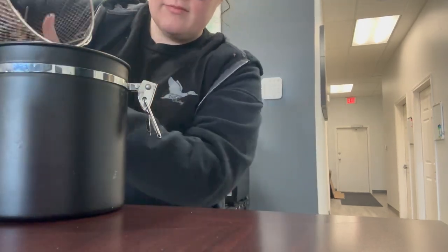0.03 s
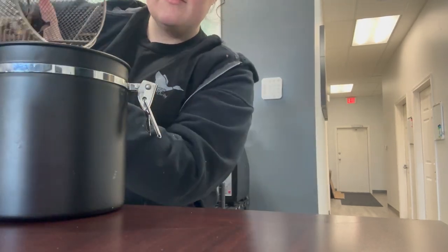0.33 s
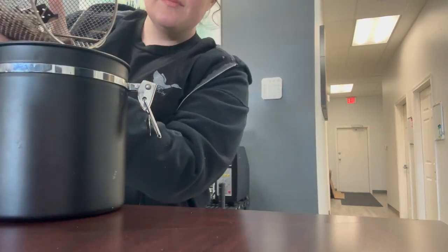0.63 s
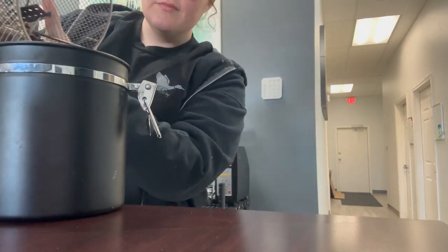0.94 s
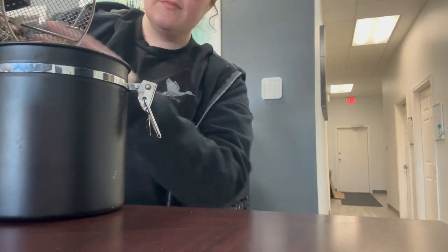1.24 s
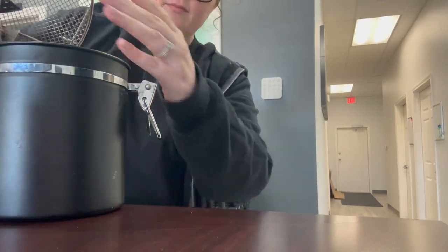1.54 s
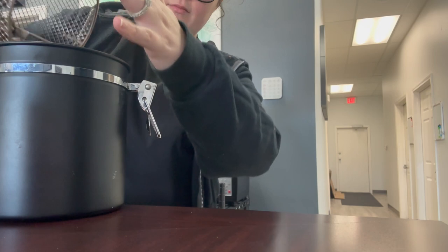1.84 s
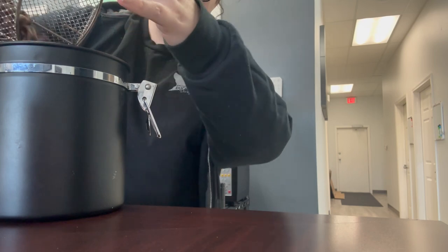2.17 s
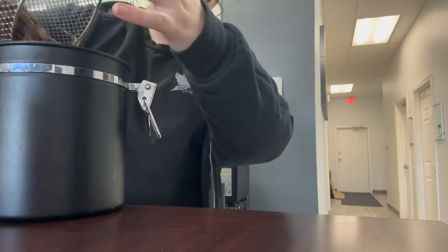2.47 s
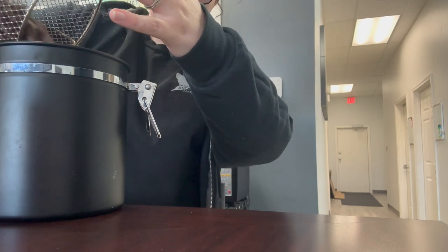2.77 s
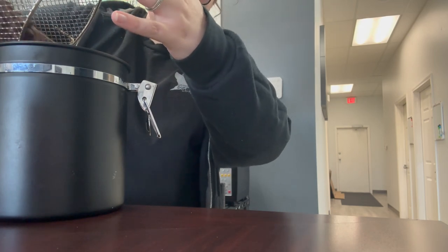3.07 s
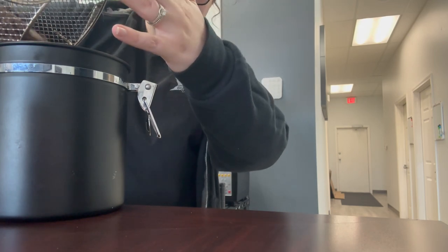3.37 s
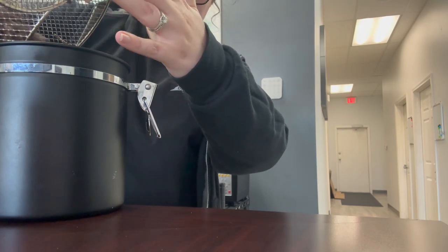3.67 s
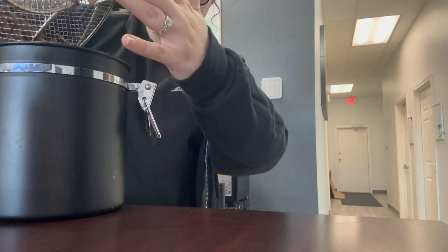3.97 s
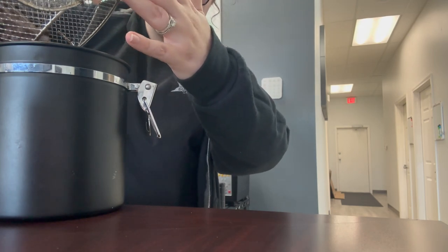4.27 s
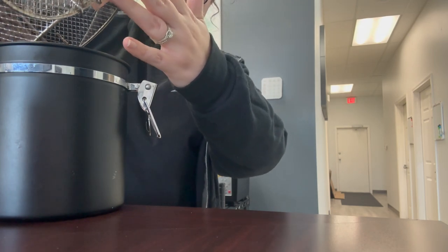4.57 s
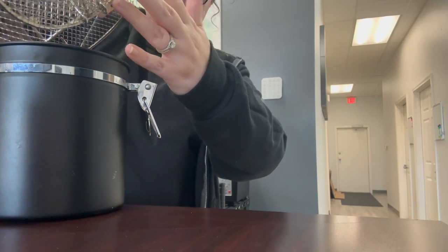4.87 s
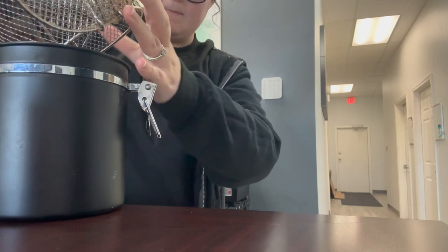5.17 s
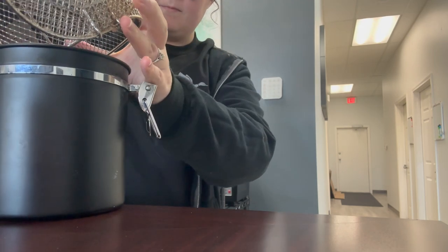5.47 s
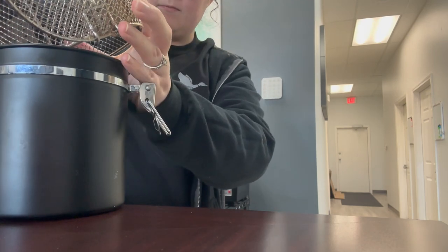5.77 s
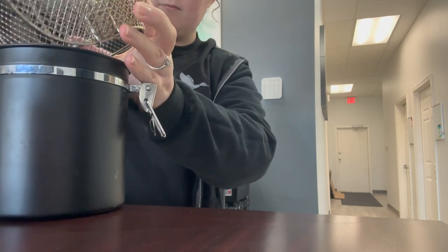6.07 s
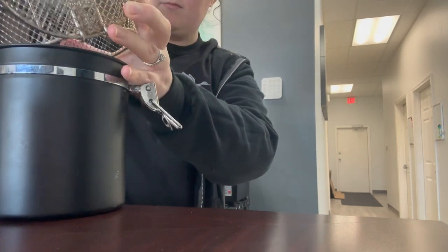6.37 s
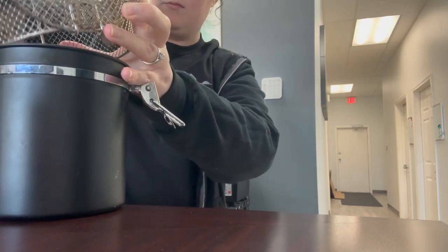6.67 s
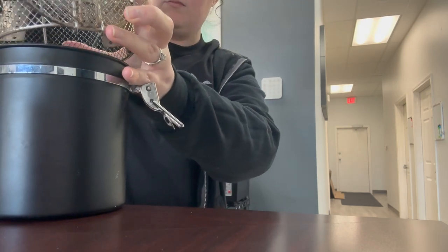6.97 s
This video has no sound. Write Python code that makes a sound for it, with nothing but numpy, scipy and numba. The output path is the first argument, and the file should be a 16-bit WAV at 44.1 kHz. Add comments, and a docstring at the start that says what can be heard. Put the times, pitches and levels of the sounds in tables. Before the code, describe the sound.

Small hard beans pour from a wire sieve into a large metal canister, rattling loudly, thinning to ticks, then the sieve scrapes the rim.

```python
"""Coffee beans hiss over a tilted wire sieve while a sleeve rubs and ventilation hums behind.
Tipped into a large metal canister on a table, a few snap on the bare bottom; then the stream drums
on it and rings its modes. The growing heap muffles the metal: beans patter on beans, the air above
them resonates, and the stream thins to single ticks. Last, the sieve wire squeaks thinly and the
sieve scrapes and knocks on the rim."""
import sys
import numpy as np
from scipy import signal
from scipy.fft import rfft, irfft, next_fast_len
from scipy.io import wavfile
from numba import njit

SR = 44100
rng = np.random.default_rng(int(sys.argv[2]) if len(sys.argv) > 2 else 0)


def digitize_waveform(pressure):
    """Quantize a signal to 16-bit integers and store it at the path in sys.argv[1].

    Rows of a 2-D input are taken as channels; values are limited to [-1, 1].
    """
    field = np.atleast_2d(pressure).T
    bounded = np.clip(field, -1, 1)
    quanta = np.round(bounded * 32767).astype(np.int16)
    wavfile.write(sys.argv[1], SR, quanta)


N = 309141
TIME = np.arange(N) / SR

# sieve envelopes: t/s, level/dB
MESH_SLIDE = [(0, -40), (0.08, -48), (0.27, -39.5), (0.4, -42), (0.55, -44.5), (0.7, -44), (0.85, -50),
              (1.0, -43), (1.12, -69)]  # beans shifting on the mesh
MESH_DRAG = [(5.44, -65), (5.53, -37), (5.72, -39), (5.81, -45), (5.87, -39), (6.02, -46.5), (6.16, -52)]  # mesh drawn over the rim
WIRE_SCRAPE = [(5.2, -47), (5.776, -49), (5.926, -38.5), (6.196, -44), (6.368, -42), (6.47, -49),
               (6.622, -46.5), (6.8, -42.5), (7.0, -50)]  # wire along the rim
# wire rasps on the rim: start/s, end/s, f/Hz, width/Hz, level/dB
WIRE_RASPS = [(5.353, 5.513, 660, 200, -45.5), (5.535, 5.756, 786, 89, -49), (5.823, 5.91, 803, 80, -45),
              (6.26, 6.42, 2820, 900, -48.5), (6.53, 6.586, 1130, 600, -43), (6.691, 6.72, 3200, 1000, -42),
              (6.88, 6.955, 1060, 269, -36)]
# two low hums and a thin squeak of the sieve wire: start/s, end/s, f/Hz, level/dB
FAINT_TONES = [(3.08, 4.22, 89.4, -51), (4.4, 5.4, 123.6, -57.5), (4.85, 5.566, 1180, -60.5)]
# weight shifting on the table, sleeve strokes: start/s, end/s, level/dB
TABLE_RUMBLES = [(.05, 2, -50), (4.9, 7.8, -56), (6.18, 6.36, -45.5), (6.519, 8.1, -50)]
SLEEVE_RUBS = [(0.268, 0.886, -35.5), (6.0, 6.945, -50)]
# first beans on bare metal: t/s, level/dB, ring re snap/dB
FIRST_DROPS = [(0.865, -2, 6.5), (0.879, -25, 26.5), (0.9669, -3.5, -2), (0.9696, -11.5, 2),
               (1.018, -12, 0), (1.0592, -6.5, -20), (1.0905, -11.5, 2), (1.097, -11, -3)]
# tips of the sieve: start/s, end/s, level/dB, sag/(dB/s), run-out t60/s
SIEVE_POURS = [(1.12, 1.633, -39.5, 4.5, 7.3), (1.786, 1.946, -38.5, -3, 1.1),
               (1.973, 2.605, -25.5, 2, 3.53), (3.255, 3.404, -39, 9, 0.32), (3.51, 5.097, -40.5, 0.96, 3),
               (5.132, 5.502, -39.5, 11, 3.1)]
# clumps on the bare bottom: t/s, level/dB, body re snap/dB
CLUMP_LANDINGS = [(1.143, 0, -32), (1.150, -5, -25), (1.162, -11, -15), (1.179, -3.5, -16.5),
                  (1.193, -7.5, -15), (1.221, -3, -18), (1.247, -4, -20), (1.266, -13, -14),
                  (1.292, -12, -23), (1.322, -2.5, -13), (1.364, -1.5, -22.5), (1.378, -2, -17),
                  (1.405, -6.5, -25), (1.419, -7, -20), (1.439, -8, -16), (1.46, -7, -17), (1.469, -8, -18),
                  (1.501, -8, -24), (1.506, -3.5, -20.5), (1.53, -3.5, -20.5), (1.542, -9.5, -15),
                  (1.581, -2.5, -21), (1.589, -7, -25), (1.611, -2.5, -21.5), (1.63, -4.5, -14),
                  (1.636, -4.5, -18), (1.657, -3.5, -22.5), (1.698, -17.5, -10), (1.733, -10.5, -19),
                  (1.752, -2.5, -18.5), (1.774, -6, -15.5), (1.805, -5, -14), (1.825, -6.5, -19),
                  (1.839, -5.5, -17), (1.85, -3.5, -21.5), (1.886, -8, -16), (1.912, -7, -17),
                  (1.932, -6.5, -14.5), (1.948, 0.5, -17.5), (1.966, -0.5, -17), (1.984, -1, -21),
                  (2.01, -0.5, -18), (2.042, -5, -14), (2.083, -4, -17), (2.1086, -6, -12),
                  (2.144, -7, -18), (2.178, 1, -19), (2.197, -4.5, -15), (2.222, -2.5, -21),
                  (2.243, -4, -13), (2.291, 1, -22.5), (2.314, -10, -20), (2.343, -4.5, -23),
                  (2.366, -1.5, -17), (2.399, -6.5, -22), (2.452, -17, -23), (2.495, -7.5, -16.5),
                  (2.598, -6.5, -24), (2.637, -13, -25), (2.732, -8, -28)]
# lone beans on mesh or heap: t/s, level/dB
BEAN_TICKS = [(2.899, -18), (3.0325, -15), (3.056, -24), (3.1466, -17), (3.216, -21), (3.267, -22),
              (3.285, -15.5), (3.299, -14.5), (3.3563, -19), (3.381, -18), (3.498, -25), (3.5259, -17),
              (3.546, -20), (3.565, -16), (3.6, -17), (3.726, -19.5), (3.785, -12.5), (3.8447, -19),
              (3.8699, -10), (3.9258, -17.5), (4.0032, -13), (4.036, -20), (4.105, -13.5), (4.125, -14),
              (4.17, -18), (4.2977, -12.5), (4.4608, -18), (4.5994, -18), (4.6306, -24), (4.7717, -15),
              (4.8015, -15.5), (4.8328, -13.5), (4.9653, -20), (4.9966, -19), (5.0766, -12.5), (5.148, -16),
              (5.172, -15), (5.19, -12.5), (5.208, -16), (5.246, -16.5), (5.257, -15), (5.2774, -13),
              (5.3618, -14), (5.3998, -14), (5.413, -14.5), (5.47, -25), (5.538, -23), (5.691, -12.5),
              (5.7227, -16.5), (5.7977, -22), (5.8406, -19.5), (5.891, -18), (5.9, -17.5), (5.9486, -20),
              (6.0028, -21), (6.0207, -14.5), (6.0417, -15), (6.106, -9), (6.1988, -17.5), (6.2372, -32),
              (6.297, -21.5), (6.345, -15), (6.402, -29), (6.4317, -16), (6.457, -37), (6.538, -28),
              (6.549, -26), (6.6023, -20), (6.72, -14), (6.7486, -24.5), (6.781, -13.5), (6.7974, -18),
              (6.807, -19), (6.8505, -19), (6.8735, -14), (6.9418, -23), (6.9797, -26), (6.985, -29)]
# sieve against rim: t/s, level/dB, edge re ring/dB, ring t60/s
RIM_KNOCKS = [(6.041, -21, -2.5, 0.069), (6.552, -36, -6, 0.023), (6.606, -24, -24, 0.085),
              (6.651, -33, -8, 0.034), (6.690, -32, 0, 0.038), (6.875, -17, -15.5, 0.04),
              (6.887, -19, -13, 0.026), (6.898, -22, -9, 0.043), (6.909, -26, -6.5, 0.084)]
# canister modes: f/Hz, width/Hz, level/dB
METAL_MODES = [(509.6, 46, -3), (1200, 260, -8), (1746, 14, -6), (2309, 54, 5.5), (3050, 40, -1),
               (3250, 27, -1), (4133, 24, 5.5), (4240, 36, 3.5), (4600, 29, -0.5), (5563, 83, 6.5),
               (6570, 100, 0), (6780, 89, 7.5), (7040, 90, 2), (8280, 76, 3), (9460, 530, 10.5),
               (11100, 180, 3.5), (12650, 160, -2)]  # bottom and wall
HOLLOW_MODES = [(2155, 58, -1), (3025, 55, 14), (3340, 230, 7.5), (4380, 150, -1.5), (4620, 61, 8.5),
                (5210, 120, 6.5), (5600, 120, 6.5), (6650, 98, 13)]  # air and wall above the heap
# sieve frame modes: f/Hz, level/dB
FRAME_MODES = [(520, -6), (590, -8), (690, -9.5), (850, -18), (1060, -19.5), (1350, -19)]
# air resonance, rising as the canister fills: t/s, f/Hz
CAVITY_PITCH = [(1.1, 508), (3.0, 529.6), (4.0, 575), (5.0, 566), (7.0, 577)]
# resonance gains, highest over a shallow heap: t/s, level/dB
HOLLOW_GAIN = [(2.55, -8), (2.85, 1), (3.7, -2), (4.3, -9)]
CAVITY_GAIN = [(2.3, 10.6), (2.6, 10.4), (3.1, 17.6), (4.3, 14.8)]
# source spectra: f/Hz, level/dB
MESH_EQ = [(800, -33), (2500, -7.5), (4500, -4.5), (6000, -4), (8000, 3), (10500, 2), (13000, 5),
           (15500, -19)]
RUSTLE_EQ = [(900, -14), (1750, -21), (2100, -3), (2450, -13), (2800, 0), (3350, -1.5), (3750, -9),
             (4600, 0), (5500, -3.5), (6200, -12), (12000, -12)]
WIRE_EQ = [(150, -48), (300, -1.5), (550, 7), (800, 1.5), (1100, -2), (1800, -5.5), (2400, 0.5), (3900, -4),
           (5000, -2), (7000, -5), (14000, -4)]
VENT_EQ = [(20, -43), (35, -30), (52, 1), (80, 0.5), (125, -6), (190, -8), (320, -5), (700, -5),
           (1200, -15), (3000, -26.5), (8000, -54), (15000, -82)]
RUMBLE_EQ = [(20, -25), (45, -6), (80, -7), (135, -6.5), (200, -14), (1000, -46)]
CLOTH_EQ = [(60, -10), (130, -5.5), (200, -12.5), (290, -0.5), (430, 3), (680, -5.5), (1000, -14.5),
            (1700, -18.5), (2300, -10.5), (3200, -25.5), (4800, -15.5), (9000, -24.5)]
SNAP_EQ = [(300, -38), (1500, -32), (3000, -20), (5000, -9.5), (7500, -2.5), (10000, 1.5), (13000, -7),
           (15500, -13)]
BLOW_EQ = [(300, -25), (1500, 2), (4000, 4), (7000, -8), (14000, -6)]
CRACK_EQ = [(150, -91), (330, -6), (450, -16), (560, -18), (700, -9.5), (1000, 5.5), (1600, 8),
            (1950, -16.5), (2450, -8), (2760, -16), (3200, -5), (4500, -8), (7000, 4.5), (12000, -19)]
BEAN_EQ = [(200, -68), (450, -38), (800, -6), (1800, -14), (2200, -9), (2600, -11.5), (3100, -3),
           (3800, -5.5), (5000, -2), (7200, -4), (8800, 2.5), (11000, 1.5), (13000, -1), (15500, -12.5)]
TICK_EQ = [(300, -27.5), (1500, -23), (3000, -11), (5000, -6), (7500, -7), (10000, -0.5), (13000, -3.5),
           (15500, -7)]
RIM_EQ = [(150, -33), (330, -9), (560, 5.5), (1100, -2), (1800, -4), (2400, 4), (5000, 0), (7000, -2),
          (14000, -9.5)]
# microphone port pair: f/Hz, likeness/(0-1), left minus right/dB
MIC_PORTS = [(50, 0.9, -0.5), (131, 0.62, 2), (356, 0.56, -2), (513, 0.92, 4.5), (1100, 0.67, -2),
             (2300, 0.78, 1.5), (3250, 0.1, -5), (5400, 0, -1.5), (8160, 0.67, -1), (8630, 0.55, -11),
             (9000, 0.94, 3.5), (10700, 1, -1.5), (13100, 1, 0.5)]

COVERED_S = 2.63  # beans cover the bottom


def undb(db):
    """Decibels to gain."""
    return 10 ** (np.asarray(db) / 20)


def unit(x):
    """Scale to rms 1."""
    return x / np.sqrt(np.mean(x ** 2))


def fade(t, t60_s):
    """Decay by 60 dB in t60_s."""
    return np.exp(-np.log(1000) * t / t60_s)


def curve(rows, outside=0):
    """Gain from (t/s, level/dB) rows; outside=None holds the end values."""
    t_s, db = np.transpose(rows)
    return np.interp(TIME, t_s, undb(db), left=outside, right=outside)


def swell(start_s, end_s):
    """Rounded rise and fall."""
    progress = np.clip((TIME - start_s) / (end_s - start_s), 0, 1)
    return np.sqrt(np.abs(np.sin(np.pi * progress)))


def gesture(start_s, end_s, attack_s, t60_s, sag_db_per_s=0):
    """Rise, sagging hold, decay."""
    rise = np.clip((TIME - start_s) / attack_s, 0, 1)
    hold = undb(-sag_db_per_s * np.clip(TIME - start_s, 0, end_s - start_s))
    return rise * hold * fade(np.maximum(TIME - end_s, 0), t60_s)


def walk(per_s):
    """Smooth random wander, spread near 1."""
    knots = rng.standard_normal(int(per_s * N / SR) + 2)
    return np.interp(TIME * per_s, np.arange(len(knots)), knots)


def noise(size=N):
    """Two independent white channels."""
    return rng.standard_normal((2, size))


def through(x, response):
    """Convolve with a unit-energy response."""
    response = np.atleast_2d(response)
    response = response / np.linalg.norm(response, axis=1, keepdims=True)
    return signal.oaconvolve(x, response, axes=1)[:, :N]


def colour(x, spectrum, size=4096):
    """Minimum-phase filter from (f/Hz, level/dB) rows."""
    hz, db = np.transpose(spectrum)
    grid_hz = np.linspace(1, SR / 2, size // 2 + 1)
    magnitude = undb(np.interp(np.log(grid_hz), np.log(hz), db))
    cepstrum = irfft(np.log(magnitude))
    cepstrum[1:size // 2] *= 2
    cepstrum[size // 2 + 1:] = 0
    return through(x, irfft(np.exp(rfft(cepstrum))))


def low_cut(x, edge_hz):
    """Fourth-order high-pass."""
    return signal.sosfilt(signal.butter(4, edge_hz, "high", fs=SR, output="sos"), x)


@njit
def resonate(x, hz, width_hz):
    """State-variable band-pass, moving centre."""
    y, band_state, low_state = np.empty(len(x)), 0., 0.
    for i in range(len(x)):
        g, damping = np.tan(np.pi * hz[i] / SR), width_hz / hz[i]
        band = (band_state + g * (x[i] - low_state)) / (1 + g * (g + damping))
        band_state = 2 * band - band_state
        low_state += 2 * g * band
        y[i] = damping * band
    return y


def steep_band(x, hz, width_hz):
    """Two band-passes in series per channel."""
    return np.array([resonate(resonate(channel, hz, width_hz), hz, width_hz) for channel in x])


def ring(x, modes, detune):
    """Modes at the input's rms; shifting load and strike spot vary pitch and gain at random."""
    out = np.zeros((2, N))
    for k, (hz, width_hz, db) in enumerate(modes):
        centre_hz = hz * (1 + detune * walk(per_s=60))
        spot_db = 2.8 * walk(per_s=45)
        gain = (-1) ** k * undb(db + spot_db) / np.sqrt(width_hz)
        out += gain * np.array([resonate(channel, centre_hz, float(width_hz)) for channel in x])
    return unit(out) * np.sqrt(np.mean(x ** 2))


def clicks(t_s, db, t60_s, rattle_db=-13, rattle_t60_s=.022, rise_s=.0001, size=1536):
    """Contacts: a noise snap plus a weaker rattle; db sets the energy of each."""
    t = TIME[:size]
    envelope = (1 - np.exp(-t / rise_s)) * (fade(t, t60_s) + undb(rattle_db) * fade(t, rattle_t60_s))
    bursts = rng.standard_normal((len(t_s), 2, size))
    comb = rng.uniform(-.7, .7, (len(t_s), 1, 1))  # bright, dull or hollow
    bursts = (bursts + comb * np.roll(bursts, shift=3, axis=2)) * envelope
    bursts *= undb(db)[:, None, None] / np.linalg.norm(bursts, axis=2, keepdims=True)
    places = (np.abs(t_s)[:, None] * SR).astype(int) + np.arange(size)
    return np.array([np.bincount(places.ravel(), bursts[:, c].ravel(), N)[:N] for c in range(2)])


def shower(per_s, spread_db, t60_s, size=256):
    """Random contacts at a steady mean rate, rms 1."""
    when, strength = rng.random((int(per_s * N / SR), 2)).T
    db = -spread_db * np.log(np.maximum(strength, .03))
    return unit(clicks(when * N / SR, db, t60_s, size=size))


def sieve():
    """Beans hiss on the mesh; later the mesh rustles over the rim and the wire catches and slips."""
    slide = curve(MESH_SLIDE) * colour(shower(per_s=2800, spread_db=0, t60_s=.0011), MESH_EQ)
    rustle = curve(MESH_DRAG) * colour(shower(per_s=4400, spread_db=-.5, t60_s=.004), RUSTLE_EQ)
    slips = shower(per_s=1200, spread_db=5, t60_s=.0028)
    catches = unit(slips * undb(3 * walk(per_s=70)))
    out = undb(2) * slide + rustle + curve(WIRE_SCRAPE) * colour(catches, WIRE_EQ)
    for start_s, end_s, hz, width_hz, db in WIRE_RASPS:
        rasp = unit(steep_band(slips, np.full(N, float(hz)), float(width_hz)))
        out += undb(db) * swell(start_s, end_s) * rasp
    return out


def ventilation():
    """Steady low air noise."""
    return undb(-49) * colour(noise(), VENT_EQ)


def table_rumble():
    """The table rumbles as weight shifts on it."""
    load = sum(undb(db) * swell(start_s, end_s) for start_s, end_s, db in TABLE_RUMBLES)
    return load * colour(noise(), RUMBLE_EQ)


def sleeve():
    """Thick cloth drags in many tiny slips as the arm moves."""
    drag = sum(undb(db) * gesture(start_s, end_s, attack_s=.25, t60_s=.8)
               for start_s, end_s, db in SLEEVE_RUBS)
    return drag * colour(shower(per_s=1600, spread_db=-1.5, t60_s=.0064), CLOTH_EQ)


def first_beans():
    """Single beans snap on the empty canister and leave it ringing."""
    t_s, db, ring_db = np.transpose(FIRST_DROPS)
    snaps = clicks(t_s, db, t60_s=.003, rattle_t60_s=.024)
    blows = clicks(t_s, db + ring_db, t60_s=.0019, rattle_db=-26.5, rattle_t60_s=.21)
    metal = ring(colour(blows, BLOW_EQ), METAL_MODES, detune=.0023)
    return undb(10) * colour(snaps, SNAP_EQ) + undb(-4) * metal


def stream(attack_s=.031, surge_db=1.74):
    """Flow envelope: pours add in power and surge in little avalanches."""
    power = sum((undb(db) * gesture(start_s, end_s, attack_s, t60_s, sag_db_per_s)) ** 2
                for start_s, end_s, db, sag_db_per_s, t60_s in SIEVE_POURS)
    return np.sqrt(power) * undb(surge_db * walk(per_s=55))


def rebounds(landings, count=3, within_s=.03, first_db=-12, loss_db_per_s=212):
    """Landings plus later, weaker hits as each clump scatters."""
    delay_s = .003 + within_s * rng.random(len(landings) * count)
    t_s, db, body_db = np.repeat(landings, count, axis=0).T
    hits = np.column_stack([t_s + delay_s, db + first_db - loss_db_per_s * delay_s, body_db])
    return np.vstack([landings, hits])


def bare_bottom(flow, muffle_db_per_s=18, ring_damping_db_per_s=38):
    """Clumps and dense hail crack on the metal; once covered, its ring dies before the crack."""
    t_s, db, body_db = rebounds(CLUMP_LANDINGS).T
    snaps = clicks(t_s + .0005, db, t60_s=.0065, rattle_db=-26, rattle_t60_s=.043, rise_s=.00029)
    blows = clicks(t_s + .0008, db + body_db, t60_s=.013, rattle_t60_s=.029, rise_s=.00091)
    buried_s = np.maximum(TIME - COVERED_S, 0)
    hail = flow * shower(per_s=240, spread_db=1, t60_s=.0083, size=512)
    drive = undb(23) * blows + undb(-2.5 - muffle_db_per_s * buried_s) * hail
    metal = undb(5.5 - ring_damping_db_per_s * buried_s) * ring(drive, METAL_MODES, detune=.004)
    crack = undb(-4) * colour(drive, CRACK_EQ)
    return undb(10) * colour(snaps, BEAN_EQ) + low_cut(crack + metal, edge_hz=420)


def tumbles(per_s=55, count=3, within_s=.016):
    """Bunches of beans tick down the heap, each striking a few times; rms 1."""
    chance = rng.random((int(per_s * N / SR), 2 + 2 * count))
    starts_s = (np.arange(len(chance)) + chance[:, 0]) / per_s
    t_s = starts_s[:, None] + within_s * chance[:, 2:2 + count]
    db = -7 * chance[:, 1:2] - 9 * chance[:, 2 + count:]  # per bunch, per strike
    return unit(clicks(t_s.ravel(), db.ravel(), t60_s=.0035, rattle_db=-14, rattle_t60_s=.012, size=512))


def heap(flow):
    """Beans patter and tumble on beans; harder falls ring the wall, the air boom rises in pitch."""
    patter = flow * shower(per_s=1100, spread_db=1, t60_s=.00054, size=512)
    thinning = np.clip((TIME - COVERED_S) / .62, 0, 1)  # bunches stand out as the stream thins
    crackle = undb(-1.5 * thinning) * patter + flow * undb(-9.25 + 3.5 * thinning) * tumbles()
    cavity_hz = np.interp(TIME, *np.transpose(CAVITY_PITCH))
    boom = curve(CAVITY_GAIN, outside=None) * steep_band(patter, cavity_hz, width_hz=84.)
    pings = flow * shower(per_s=140, spread_db=1.5, t60_s=.0017)
    hollow = curve(HOLLOW_GAIN, outside=None) * ring(pings, HOLLOW_MODES, detune=.0083)
    return undb(5.5) * colour(crackle, BEAN_EQ) + hollow + boom


def lone_beans():
    """Single hard ticks with a tiny bounce; the heap damps the wall."""
    t_s, db = np.transpose(BEAN_TICKS)
    snaps = clicks(t_s + .001, db, t60_s=.0031, rattle_db=-18, rattle_t60_s=.012)
    bounces = clicks(t_s + .0027, db, t60_s=.009)
    ticks = colour(undb(12.5) * snaps + undb(8.5) * bounces, TICK_EQ)
    return ticks + undb(-9) * ring(snaps, HOLLOW_MODES, detune=.0069)


def faint_tones(wander_hz=4.34, flicker_db=2.5):
    """Two low hums and a thin squeak of the sieve wire: wavering sines that swell and fade."""
    out = np.zeros(N)
    for start_s, end_s, hz, db in FAINT_TONES:
        phase = 2 * np.pi * np.cumsum(hz + wander_hz * walk(per_s=40)) / SR
        tone = np.sin(phase) * undb(flicker_db * walk(per_s=30))
        out += undb(db) * swell(start_s, end_s) * unit(tone)
    return out


def knocks(spot_db=2, detune=.025):
    """The sieve frame bumps the rim, each time on another spot: dull ring, wiry edge."""
    t_s, db, edge_db, t60_s = np.transpose(RIM_KNOCKS)
    hz, mode_db = np.transpose(FRAME_MODES)
    t = TIME[:SR // 8]
    body = np.zeros(N + len(t))
    starts = ((t_s + .0011) * SR).astype(int)
    for start, gain, decay_s in zip(starts, undb(db), t60_s):
        level_draw, pitch_draw = rng.standard_normal((2, len(hz), 1))
        struck_hz = hz[:, None] * (1 + detune * pitch_draw)
        modes = undb(mode_db[:, None] + spot_db * level_draw) * np.sin(2 * np.pi * struck_hz * t)
        body[start:start + len(t)] += gain * fade(t, decay_s) * modes.sum(0)
    edges = clicks(t_s + .000915, db + edge_db, t60_s=.0054, rattle_db=-15, rattle_t60_s=.06)
    return low_cut(undb(-2.5) * body[:N] + undb(27.5) * colour(edges, RIM_EQ), edge_hz=200)


def echoes(x, t60_s):
    """Dense, decaying room reflections."""
    t = TIME[:SR // 2]
    return through(x, noise(len(t)) * fade(t, t60_s))


def scene():
    """Close sources, weak room tail, background."""
    flow = stream()
    near = first_beans() + lone_beans() + bare_bottom(flow) + heap(flow) + sieve() + knocks() + sleeve()
    return near + undb(-7.5) * echoes(near, t60_s=.07) + ventilation() + faint_tones() + table_rumble()


def record(dry, delay_s=.000093, top_hz=15700):
    """Two spaced ports hear a partly shared sound, the right one later; soft clip, low-pass."""
    size = next_fast_len(N + SR // 8)
    grid_hz = np.linspace(0, SR / 2, size // 2 + 1)
    hz, *columns = np.transpose(MIC_PORTS)
    likeness, balance_db = (np.interp(grid_hz, hz, column) for column in columns)
    left, other = rfft(dry, size)
    right = likeness * left + np.sqrt(1 - likeness ** 2) * other
    right *= np.exp(-2j * np.pi * grid_hz * delay_s)
    ports = irfft(np.array([left * undb(balance_db / 2), right * undb(-balance_db / 2)]), size)[:, :N]
    low_pass = signal.ellip(10, .2, 70, top_hz, fs=SR, output="sos")
    return signal.sosfilt(low_pass, np.tanh(ports))


dry = scene()
out = record(dry)
digitize_waveform(out)
```